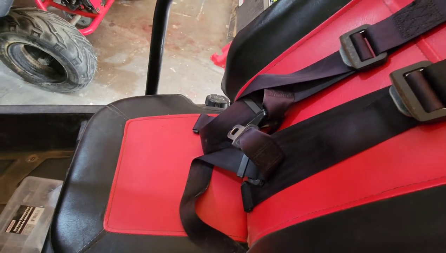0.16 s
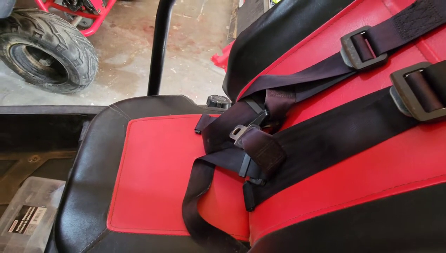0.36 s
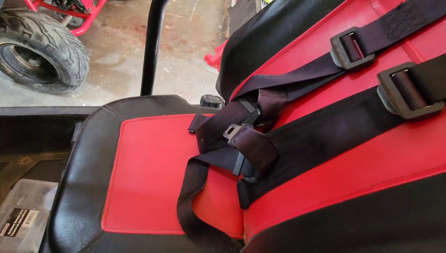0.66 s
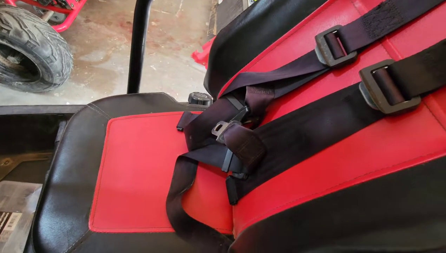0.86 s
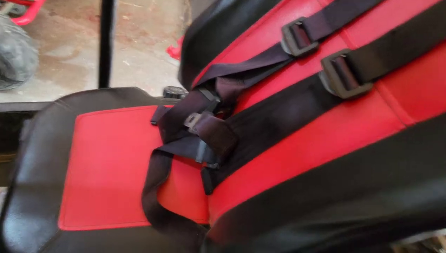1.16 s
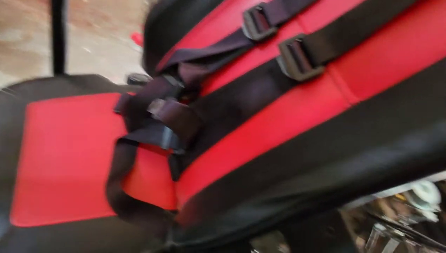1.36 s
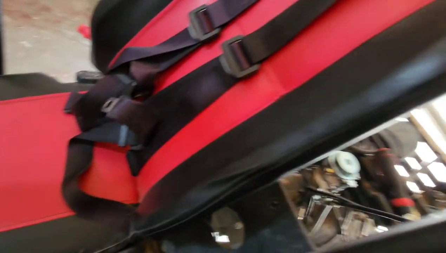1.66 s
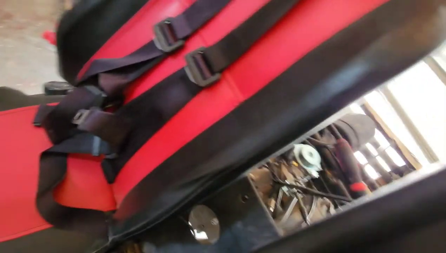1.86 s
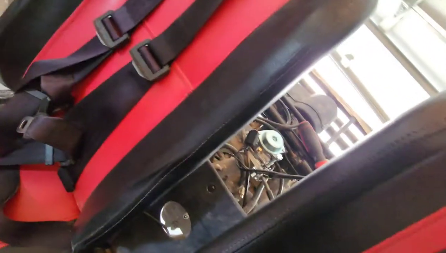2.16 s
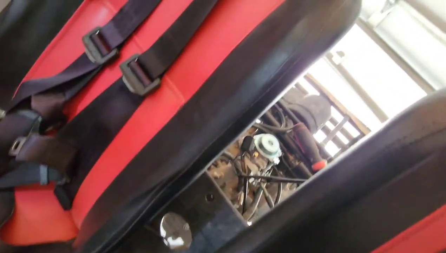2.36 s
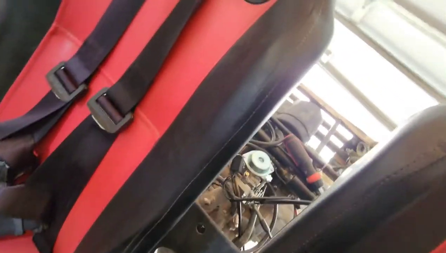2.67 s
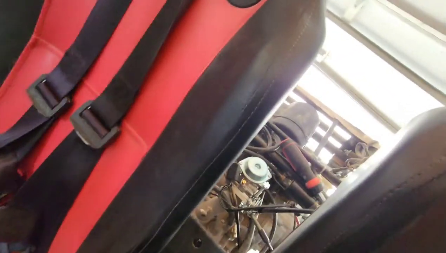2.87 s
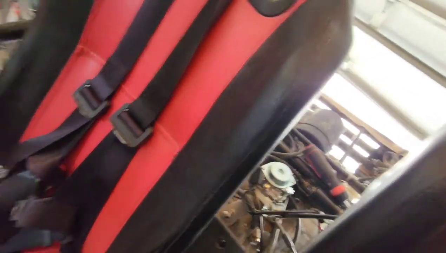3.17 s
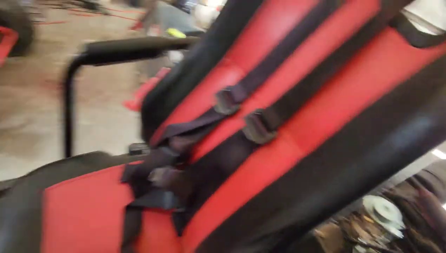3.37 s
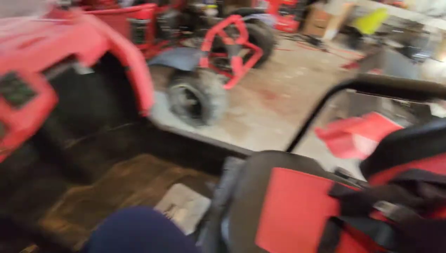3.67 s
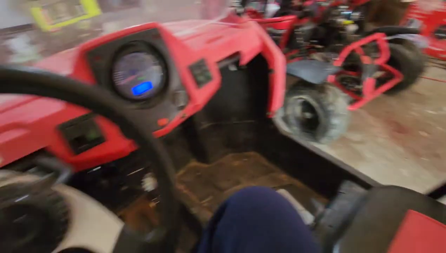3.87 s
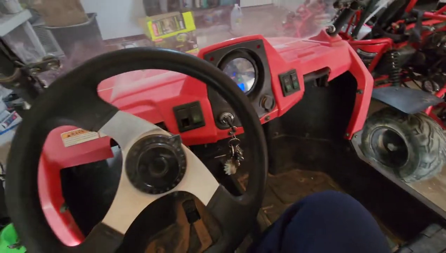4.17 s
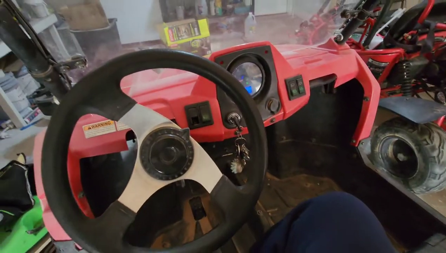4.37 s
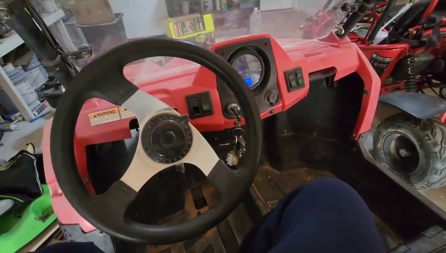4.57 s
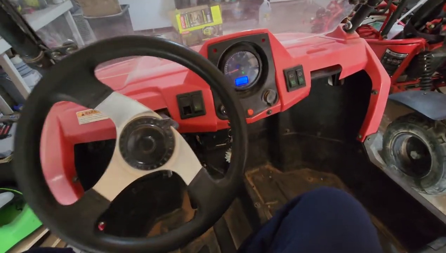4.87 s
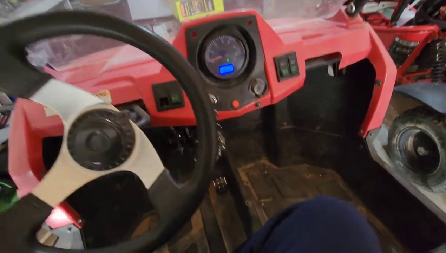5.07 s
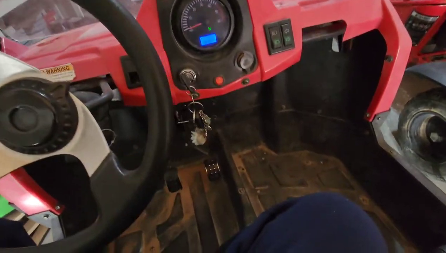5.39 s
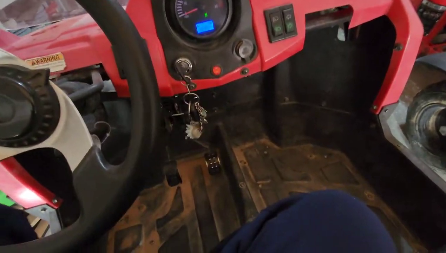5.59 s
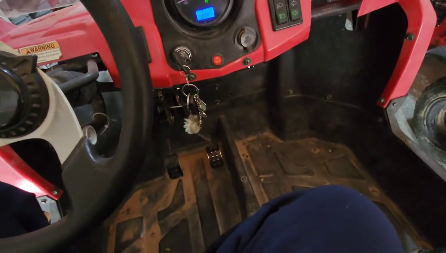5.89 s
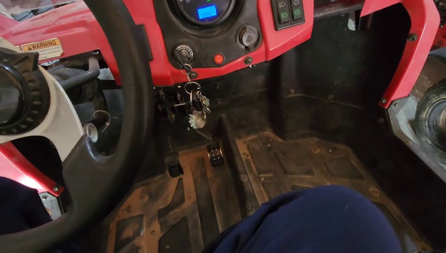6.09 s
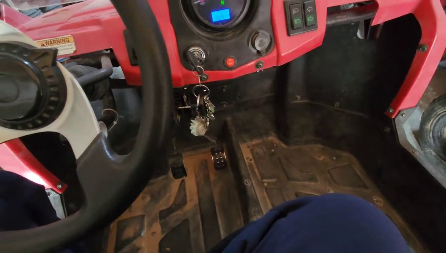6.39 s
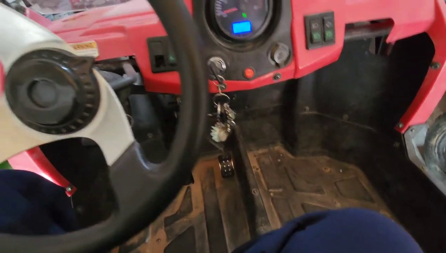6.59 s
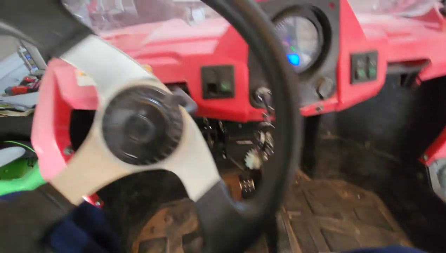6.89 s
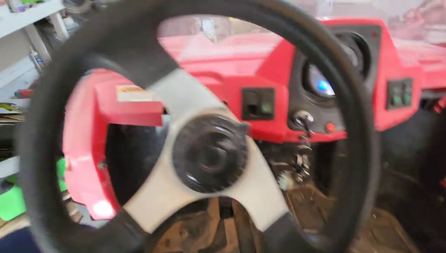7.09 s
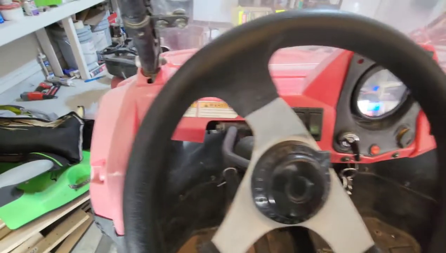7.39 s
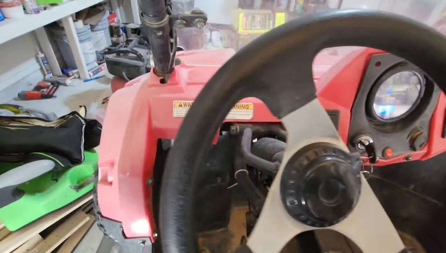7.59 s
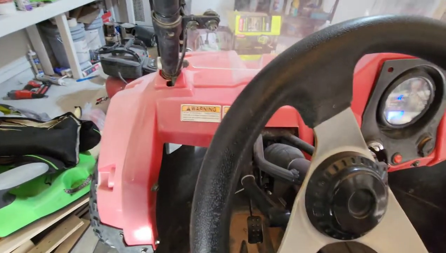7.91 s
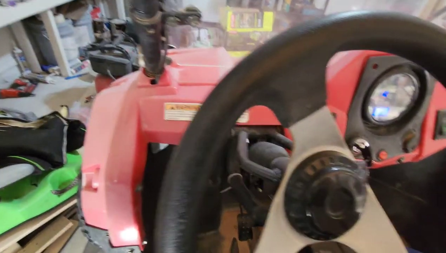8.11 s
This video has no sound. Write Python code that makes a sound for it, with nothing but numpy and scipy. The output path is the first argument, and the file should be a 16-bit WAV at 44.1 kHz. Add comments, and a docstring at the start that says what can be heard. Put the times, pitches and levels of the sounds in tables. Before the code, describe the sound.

A small engine runs without a break for about eight seconds in a garage, heard from the driver's seat. From the start a loud low drone, about 47 pulses a second with strong buzzing overtones, holds almost level in pitch. Beneath it lie steady rumble, rough exhaust noise, rapid valve ticks, dense metallic rattle and wide airy hiss. Around 1.2 to 1.8 s the microphone turns toward the engine bay, and roar and clatter come forward slightly until 3.2 s. It then swings to the steering wheel by 3.75 s; the hum's colour shifts, it grows a touch fuller, and the top treble softens, dullest at the dashboard around 5.4 to 6.3 s. Speed sags very slightly near 4.5 s and recovers by 7 s, as some airiness returns. Faint wavering whines, high and midrange, pass throughout. The engine is still running at the end.

```python
"""A small engine hums at a fast steady speed in a garage, heard from the seat of the vehicle.
The hum stacks overtones of the firing; echoes make them swell and fade as the listener turns from
the seats to the engine bay, then to the dashboard. Overtones that whine for a while pass over it.
Shaped noise gives rumble, exhaust roar, clatter and hiss; valve gear ticks and loose metal rattles."""
import sys
import numpy as np
from scipy import signal
from scipy.fft import rfft, irfft
from scipy.io import wavfile
from scipy.ndimage import uniform_filter1d

SR = 44100
rng = np.random.default_rng(int(sys.argv[2]) if len(sys.argv) > 2 else 0)


def generate_wav(sig):
    """Save sig (samples, or channels by samples) to the path in sys.argv[1] as 16-bit PCM at SR."""
    pcm = np.round(np.clip(np.atleast_2d(sig).T, -1, 1) * 32767).astype(np.int16)
    wavfile.write(sys.argv[1], SR, pcm)


N = 363825
TIME = np.arange(N) / SR
FIRING_HZ = 47  # nominal rate, for placing the overtones in echoes and spectra
CONTROL_STEP = 64  # samples between values of a slow control
FFT_SIZE, HOP = 1024, 256  # noise frames, samples


def amp(db):
    """Turns decibels into gain."""
    return 10 ** (np.asarray(db) / 20)


def evened(x):
    """Scales to rms 1."""
    return x / np.sqrt(np.mean(abs(x) ** 2) + 1e-20)


def read(points, hz):
    """Reads a spectrum on a log-frequency axis."""
    f, value = np.transpose(points)
    return np.interp(np.log(hz + 1), np.log(f + 1), value)


def drift(*parts):
    """Slow complex chance with a Gaussian spectrum, summed from parts (rms size, 1/e width Hz)."""
    count = len(TIME[::CONTROL_STEP])
    f = np.fft.fftfreq(count, CONTROL_STEP / SR)
    spectrum = np.zeros(count, complex)
    for size, hz in parts:
        chance = rng.standard_normal(count) + 1j * rng.standard_normal(count)
        spectrum += size * evened(chance * np.exp(-(f / hz) ** 2))
    return np.fft.ifft(spectrum, norm="ortho")


def fine(slow):
    """Fills in a slow control to one value a sample."""
    return np.interp(TIME, TIME[::CONTROL_STEP], slow)


def wander(*parts):
    """Slow complex chance, one value a sample."""
    return fine(drift(*parts))


# where the listener attends: (time [s], place [0 seats, 1 bay, 2 turning, 3 wheel, 4 dash, 5 leaning back])
LISTENER_PLACE = [(0, 0), (1.2, 0), (1.8, 1), (3.2, 1), (3.38, 2), (3.52, 2), (3.75, 3), (4.9, 3), (5.4, 4),
                  (6.3, 4), (7, 5)]
WHERE = np.interp(TIME, *np.transpose(LISTENER_PLACE))


def by_place(values, step=1):
    """Blends one value a place as the listener moves."""
    return np.interp(WHERE[::step], range(len(values)), values)


# reflections from floor, seats and walls, one row a place: (extra path [m], signed strength [ratio])
ECHO_PATHS = [
    [(0.61, 0.25), (2.09, 0.42), (3.18, -0.12), (5.82, -0.34), (6.6, -0.7)],
    [(2.16, 0.71), (4.9, 0.4), (5.62, -0.59), (6.3, -0.89), (6.76, -0.77)],
    [(0.85, 0.59), (2.37, 0.43), (5.77, -0.28), (6.5, -0.5), (6.97, -0.53)],
    [(0.76, 0.71), (2.16, -0.51), (3.11, -0.53), (3.73, 0.56), (4.74, -1.07)],
    [(0.98, -1), (2.17, -0.25), (3.77, 0.54), (4.96, 0.26), (6.33, 0.67)],
    [(1.68, -0.68), (2.1, -0.56), (3.86, 0.78), (4.9, -0.59), (5.65, 1)],
]
SOUND_M_PER_S = 343


def reflections():
    """Direct sound plus delayed echoes, which reinforce or cancel each overtone; one row a place."""
    path_m, strength = np.transpose(ECHO_PATHS)[..., None]
    cycles = ORDER * FIRING_HZ * path_m / SOUND_M_PER_S
    return 1 + (strength * np.exp(-2j * np.pi * cycles)).sum(axis=0)


# stereo likeness of the noises: (frequency [Hz], left-right correlation [-1 to 1])
STEREO_LIKENESS = [(60, 0.99), (120, 0.88), (240, 1), (480, 0.35), (950, 0.0026), (1890, -0.084),
                   (3770, -0.059), (7520, -0.061), (15000, 0.55)]


def noise(colour, patchy_db, echoed=0.):
    """Coloured stereo noise in drifting patches; echoed scales, in dB, the echoes' peaks and dips."""
    frames, hz = N // HOP + 5, np.fft.rfftfreq(FFT_SIZE, 1 / SR)
    a, b, c, d, patches = rng.standard_normal((frames, len(hz), 5)).T
    patches = uniform_filter1d(patches, size=10, axis=0)  # across frequency
    patches = evened(uniform_filter1d(patches, size=8, axis=1))  # across time
    same = np.clip(read(STEREO_LIKENESS, hz), -1, 1)[:, None]
    left, other = a + 1j * b, c + 1j * d
    z = np.array([left, same * left + np.sqrt(1 - same ** 2) * other])
    z *= amp(read(colour, hz)[:, None] + patchy_db * patches)
    if echoed:
        gain = abs(reflections())
        gain_db = [np.interp(hz, ORDER * FIRING_HZ, 20 * np.log10(evened(row))) for row in gain]
        moving = np.array([by_place(row, step=HOP) for row in np.transpose(gain_db)])
        z *= amp(echoed * np.pad(moving, ((0, 0), (0, frames - moving.shape[1])), "edge"))
    return evened(signal.istft(z, nperseg=FFT_SIZE, noverlap=FFT_SIZE - HOP)[1][:, :N])


# colour of the upper hiss: (frequency [Hz], relative level [dB])
HISS_COLOUR = [(2000, -11), (3200, -10.5), (5000, -3.5), (8000, -3), (10000, -3.5), (11000, -13),
               (13000, -14), (16000, -43)]


def hiss(hiss_db, firing, group):
    """Treble noise that throbs slightly with each firing and more with each group of three."""
    return amp(hiss_db) * noise(HISS_COLOUR, 1.96) * (1 + 0.011 * firing + 0.039 * group)


# colour of the top treble: (frequency [Hz], relative level [dB])
TOP_COLOUR = [(8000, -38), (10500, -22), (12000, -12), (13000, 0), (16000, 5)]


def top_treble(top_db, firing, group):
    """The airiest noise, with the deepest throb and a random waver."""
    throb = 1 + .08 * firing + .15 * group + wander((.15, 5.)).real
    return amp(top_db) * noise(TOP_COLOUR, 3.) * throb


# resonances of loose metal parts: (frequency [Hz], width [Hz], relative level [dB])
METAL_PARTS = [(4460, 180, -5), (5574, 97, -3.5), (6500, 27, -5), (7215, 75, -1.5), (8620, 330, 3.5),
               (10400, 170, -0.5), (11320, 340, -5), (12000, 170, -2), (14000, 85, -12), (14440, 200, -4)]


def rattle(throb):
    """Dense tiny knocks ring the loose metal parts as decaying sines, each at its own pitch."""
    t, out = np.arange(1024) / SR, np.zeros((2, N))
    struck = rng.random((2, N)) < 9000 * throb / SR  # about 9000 knocks per s in each channel
    knocks = rng.standard_normal((2, N)) * struck
    part = rng.integers(0, len(METAL_PARTS), (2, N))
    for k, (hz, width, db) in enumerate(METAL_PARTS):
        decay = np.exp(-np.pi * width * t)
        ring = amp(db) * np.sqrt(width) * decay * np.sin(2 * np.pi * hz * t)
        shaken = knocks * (part == k) * abs(1 + 0.38 * wander((1, 5.)))
        out += signal.oaconvolve(shaken, ring[None], axes=1)[:, :N]
    # each side leaks into the other; left is 1 dB louder
    return evened(out + 0.73 * out[::-1]) * amp([[.5], [-.5]])


# colour of the low rumble: (frequency [Hz], relative level [dB])
RUMBLE_COLOUR = [(30, -14), (60, -18), (120, -3), (250, -1), (330, -7.5), (450, -1), (600, -9), (900, -33)]
RUMBLE_DB = -34.5


def rumble():
    """Steady low noise, strongly coloured by the echoes."""
    return amp(RUMBLE_DB) * noise(RUMBLE_COLOUR, 2.2, .8)


# colour of the mechanical clatter and its ticks: (frequency [Hz], relative level [dB])
CLATTER_COLOUR = [(700, -43), (1100, -5), (1600, -4), (2000, -3.5), (2400, -4), (3000, -9), (4000, -11.5),
                  (6000, -22)]


def ticking(turn):
    """The valve gear knocks alike at each firing, through three echo patterns that take turns."""
    firings = np.diff(np.floor(turn / (2 * np.pi)), prepend=0)
    knocks = firings * amp(1.2 * rng.standard_normal(N))  # levels scatter by 1.2 dB
    size, out = 4096, np.zeros((2, N))
    t, hz = np.arange(size) / SR, np.fft.rfftfreq(size, 1 / SR)
    for k in range(3):
        coloured = irfft(rfft(rng.standard_normal((2, size))) * amp(read(CLATTER_COLOUR, hz)))
        echoes = coloured * amp(-60 * t / .055)  # falls 60 dB in 55 ms
        fade = np.cos(2 * np.pi * (.5 * TIME + k / 3))  # squares sum to a constant
        out += signal.oaconvolve((knocks * fade)[None], echoes, axes=1)[:, :N]
    return evened(out)


def clatter(clatter_db, turn, firing, group):
    """Mechanical noise with a faint throb, and the valve gear's ticks 6.5 dB below it."""
    wash = noise(CLATTER_COLOUR, 1.4) * (1 + 0.0093 * firing + 0.022 * group)
    return amp(clatter_db) * wash + amp(clatter_db - 6.5) * ticking(turn)


# colour of the exhaust roar: (frequency [Hz], relative level [dB])
ROAR_COLOUR = [(300, 0), (550, -3), (800, 3.5), (1000, -3), (1300, -6.5), (1800, -25.5)]


def roar(roar_db, firing):
    """Exhaust noise, coloured by the echoes and pulsing with each firing."""
    return amp(roar_db) * noise(ROAR_COLOUR, 1.4, 0.44) * (1 + 0.054 * firing)


# overtones that stand out for a while:
# (start [s], length [s], multiple of the firing, rms level before waver and stereo balance [dB])
PASSING_WHINES = [(.3, 0.66, 48, -47), (.7, 4.3, 42, -47), (1.68, 0.56, 50, -42), (1.8, 1.6, 52, -47),
                  (1.95, 1.0, 42, -46), (2.5, 1.5, 46, -46), (3.6, 1.5, 17, -40.5), (3.9, 0.84, 22, -41),
                  (4.55, .4, 50, -41), (4.98, .75, 42, -40.5), (5.3, .65, 46, -48), (6.5, 1.7, 42, -50),
                  (6.8, 1.8, 16, -45), (6.8, .7, 17, -42), (7.1, 1.1, 21, -59), (7.55, 1., 50, -45.5),
                  (7.7, .9, 49, -55)]
WHINE_RISE_S, WHINE_FALL_S = 0.13, 0.31


def whine(turn):
    """Single multiples of the firing whine out: each wavering tone fades in, holds and fades out."""
    out = np.zeros((2, N))
    waver = np.array([1 + wander((.5, 4.), (.45, 25.)) for _ in range(4)]).reshape(2, 2, N)
    for row, (start, length, order, db) in enumerate(PASSING_WHINES):
        end = start + length
        on = slice(round(start * SR), min(round(end * SR), N))
        rise, fall = (TIME[on] - start) / WHINE_RISE_S, (end - TIME[on]) / WHINE_FALL_S
        fade = np.clip(np.minimum(rise, fall), 0, 1)
        tone = np.sqrt(2) * np.exp(1j * round(order) * turn[on])
        out[:, on] += (amp(db) * fade * waver[row % 2, :, on] * tone).real
    return out


# lines a third above some overtones: (multiple of the firing, rms level before waver [dB])
THIRD_LINES = [(7 / 3, -36.5), (19 / 3, -47)]


def thirds(turn):
    """Unlike firings repeat in threes, which adds tones between the overtones."""
    out = np.zeros(N)
    for k, db in THIRD_LINES:
        out += amp(db) * np.sqrt(2) * ((1 + wander((.3, 1.5))) * np.exp(1j * k * turn)).real
    return out


# overtones of the firing as they leave the exhaust: (multiple of the firing, relative level [dB])
EXHAUST_OVERTONES = [(1, -19), (2, -1.5), (3, -8), (4, -11), (5, -4.5), (6, -19), (7, -14.5), (8, -13),
                     (9, -17.5), (10, -13), (11, -19), (12, -25), (13, -31), (14, -23.5), (15, -30.5),
                     (16, -25), (17, -38.5), (18, -28.5), (19, -37.5), (20, -32), (21, -33.1), (22, -33.5)]
ORDER = np.round(np.transpose(EXHAUST_OVERTONES)[0])
# when the direct pulse arrives, one value a place: (delay [firing cycles])
PULSE_ARRIVAL = .81, .79, .77, .38, .9, .39
SMEAR = .24  # each overtone lags the one below by this much more, in cycles


def heard_overtones():
    """Exhaust overtones after smear, echoes and arrival delay: complex shares, one row a place."""
    smear = np.exp(-1j * np.pi * SMEAR * (ORDER - 2) ** 2)
    heard = amp(np.transpose(EXHAUST_OVERTONES)[1]) * smear * reflections()
    heard *= np.exp(-2j * np.pi * np.outer(PULSE_ARRIVAL, ORDER))
    return heard / np.linalg.norm(heard, axis=1, keepdims=True)


# hum that differs left to right: (frequency [Hz], level relative to WIDTH_DB [dB])
HUM_WIDTH = [(47, -26), (94, -9), (140, -8), (190, -1), (240, -6), (440, -4.5), (660, -13), (1100, -27)]
WIDTH_DB = -36


def hum(turn, hum_db):
    """Clean overtones of the firing; reflections set their levels and lags by place."""
    mid, side = np.zeros((2, N))
    for k, share in zip(ORDER, heard_overtones().T):
        tone = np.sqrt(2) * np.exp(1j * k * turn)
        lag = np.exp(1j * by_place(np.unwrap(np.angle(share)), step=CONTROL_STEP))
        level = amp(by_place(20 * np.log10(abs(share)), step=CONTROL_STEP))
        # high overtones waver most
        uneven = 1 + np.sqrt(k) * drift((.022, 9.), (.012, 1.2), (.012, 30.))
        mid += (fine(level * lag * uneven) * tone).imag
        side_level = amp(WIDTH_DB + read(HUM_WIDTH, k * FIRING_HZ))
        side_waver = 1j + drift((.6, .7), (.15, 9.))  # 1j: a quarter cycle from the middle
        side += side_level * (fine(lag * side_waver) * tone).imag
    mid = amp(hum_db) * mid + thirds(turn)
    return np.array([mid + side, mid - side])


# engine speed: (time [s], firing rate [firings per s])
ENGINE_SPEED = [(0.0, 47.04), (0.78, 47.37), (1.73, 46.83), (2.3, 46.86), (2.58, 46.63), (3.51, 47.0),
                (3.91, 46.76), (4.08, 46.42), (4.45, 46.3), (4.91, 46.64), (5.33, 46.39), (5.82, 46.43),
                (6.0, 46.75), (6.24, 46.72), (6.55, 47.22), (6.92, 47.43), (7.68, 47.04), (8.24, 47.28)]


def engine_turn():
    """Running phase of the firing, in radians, summed from the engine speed."""
    firings = np.interp(TIME, *np.transpose(ENGINE_SPEED))
    return 2 * np.pi * np.cumsum(firings) / SR


# layer levels before throb and stereo balance, one row a place:
# (hum [dB], roar [dB], clatter [dB], hiss [dB], top treble [dB])
PLACE_LEVELS = [(-14.5, -35, -31, -32, -33), (-14.5, -30.5, -28.5, -31.5, -34),
                (-14.5, -32, -29, -31.5, -31), (-13.5, -33.5, -32, -32.5, -39),
                (-14, -33.5, -31.5, -32, -44), (-14, -33.5, -31.5, -32, -38)]


def scene():
    """Mixes the noises, whines and hum; most noises throb with the firing or its groups of three."""
    hum_db, roar_db, clatter_db, hiss_db, top_db = map(by_place, np.transpose(PLACE_LEVELS))
    turn = engine_turn()
    firing, group = np.cos(turn), np.cos(turn / 3)
    out = hiss(hiss_db, firing, group) + top_treble(top_db, firing, group)
    out += amp(hiss_db - 3.0) * rattle(1 + 0.26 * group)
    out += rumble() + roar(roar_db, firing)
    left_louder = amp([[.8], [-.8]])  # dB, left and right
    out += left_louder * (clatter(clatter_db, turn, firing, group) + whine(turn))
    return out + hum(turn, hum_db)


def record(dry):
    """Limits the band with a steep linear-phase low-pass."""
    edge_hz = 15735
    lowpass = signal.firwin(2047, edge_hz, window=("kaiser", 9), fs=SR)
    return signal.oaconvolve(dry, lowpass[None], "same")


dry = scene()
out = record(dry)
generate_wav(out)
```